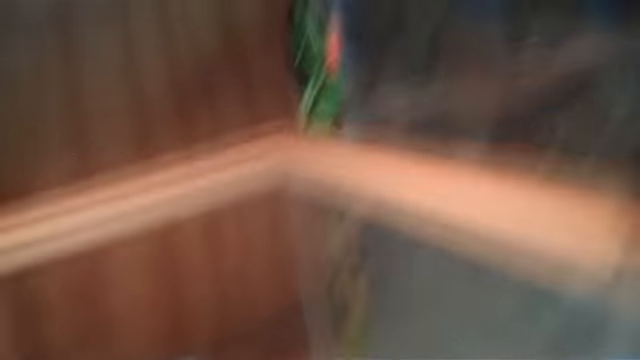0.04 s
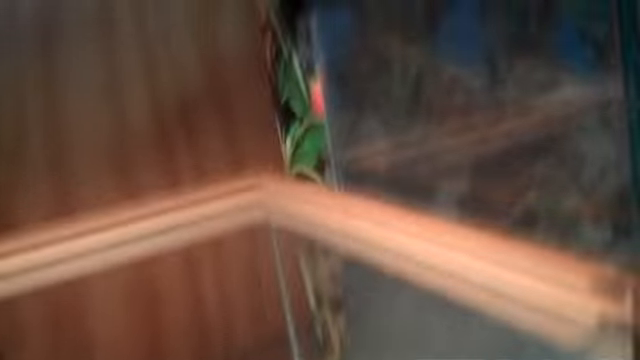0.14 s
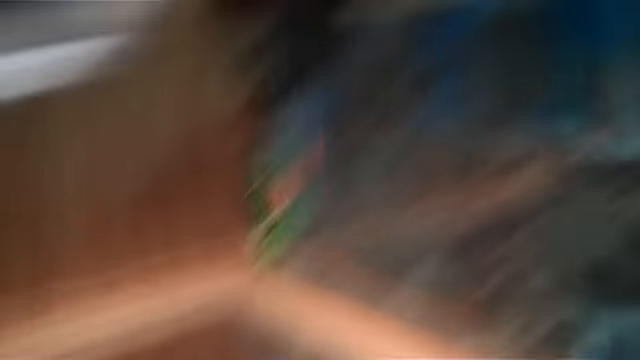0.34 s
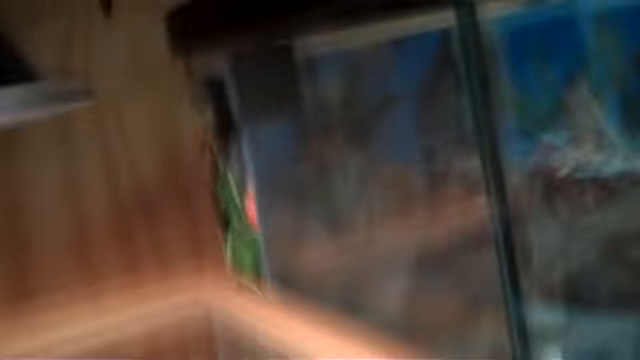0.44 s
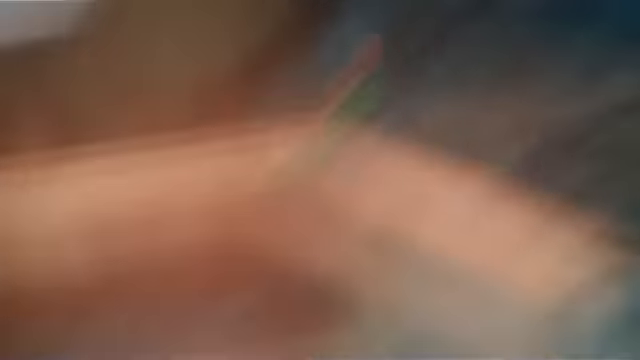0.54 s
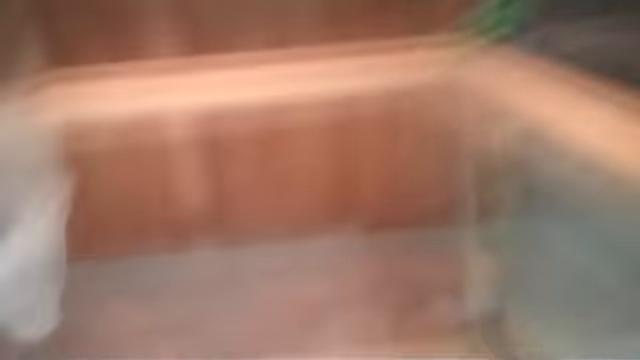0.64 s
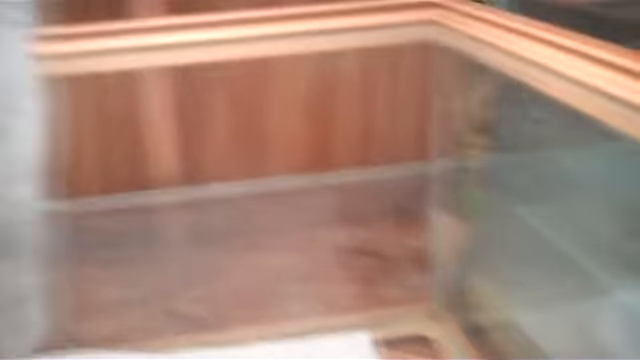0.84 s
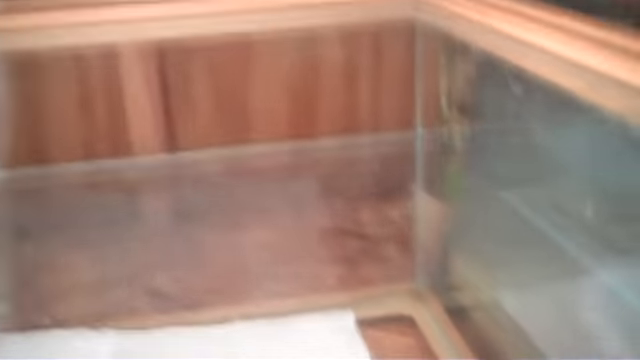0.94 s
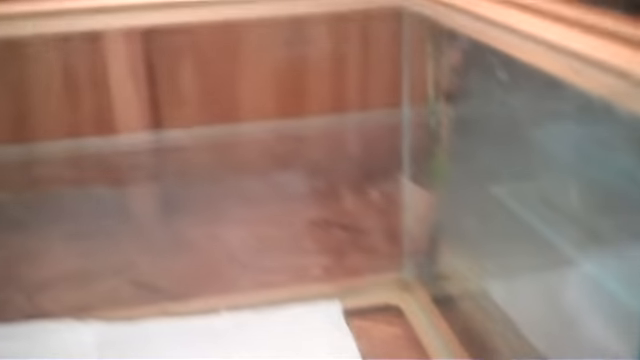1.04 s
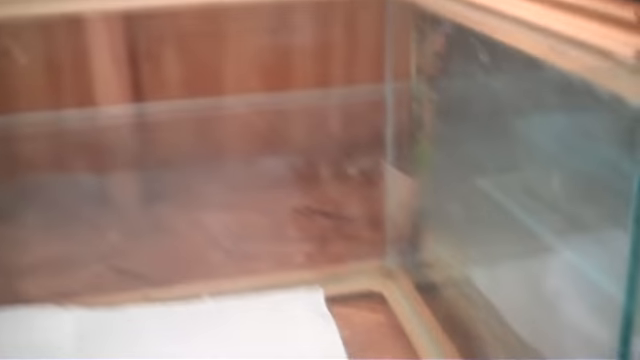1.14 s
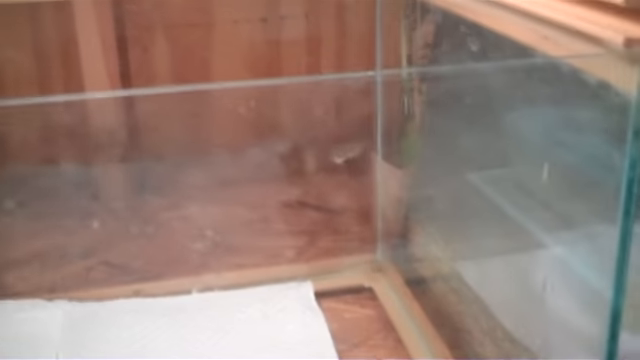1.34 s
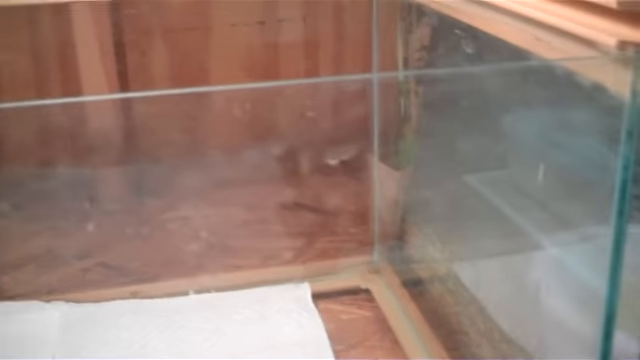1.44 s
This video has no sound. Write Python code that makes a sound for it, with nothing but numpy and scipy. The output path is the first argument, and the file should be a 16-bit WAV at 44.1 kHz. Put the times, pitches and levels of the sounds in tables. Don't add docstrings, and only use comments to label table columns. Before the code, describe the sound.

A thin plastic tub crackles under a gripping hand, very close: small knocks and skin scrapes from 0 s, the loudest sharp snaps around 0.17-0.21 s, another bright cluster at 0.31 s. It falls quiet by 0.4 s. A single snap comes at 0.64 s, then dry bedding trickles faintly onto paper, with isolated ticks near 0.71, 0.99, 1.11, 1.17 and 1.29 s over soft room hush.

```python
import sys
import numpy as np
from scipy import signal
from scipy.fft import rfft, irfft, next_fast_len
from scipy.io import wavfile
from scipy.ndimage import uniform_filter1d

SR = 44100
rng = np.random.default_rng(int(sys.argv[2]) if len(sys.argv) > 2 else 0)


def to_linear_factor(level_db):
    exponent = np.asarray(level_db, float) / 20
    return 10 ** exponent


def to_wav(sig):
    pcm = np.clip(np.atleast_2d(sig), -1, 1) * 32767
    pcm = np.round(pcm).astype(np.int16)
    wavfile.write(sys.argv[1], SR, pcm.T)


N = 63945

# f/Hz, density/dB
ROOM_SPECTRUM = [(20, -12), (70, 4.5), (180, 4.5), (330, -0.5), (600, 2), (1700, -19.5), (6000, -15),
                 (11000, -23.5), (14000, -38)]
# t/s, level/dB
BEDDING_FLOW = [(0, -80), (.3, -45), (.45, -50.5), (.52, -55.5), (.6, -50.5), (.66, -44.5), (.7, -48.5),
                (.78, -44.5), (.86, -50.5), (.92, -46), (.97, -42.5), (1.04, -41), (1.1, -44), (1.155, -48),
                (1.19, -44), (1.25, -49), (1.3, -43.5), (1.45, -47.5)]
# f/Hz, density/dB
RUSTLE_SPECTRUM = [(200, -8), (400, -6), (1300, -5), (4000, -2), (7000, -6), (9000, -7.5), (11500, -8),
                   (14000, -2.5)]
# t/s, level/dB
HAND_EFFORT = [
    (0, -54),
    (.05, -50),
    (.058, -51),
    (.08, -40.5),
    (.11, -39),
    (.145, -35),
    (.163, -47),
    (.19, -31.5),
    (.24, -39.5),
               (.255, -36),
    (0.279, -38.5),
    (.3, -41.5),
    (.31, -40),
    (.325, -39),
    (.335, -48),
    (0.358, -54.5),
    (0.392, -48),
    (0.429, -54.5),
]
# f/Hz, density/dB
SCRAPE_SPECTRUM = [(200, 0), (400, 2.5), (1200, 0.5), (3000, -7.5), (6000, -9), (9000, -17.5), (11000, -38),
                   (14000, -48)]
# f/Hz, density/dB
THUD_SPECTRUM = [(20, -48), (60, -11.5), (120, -16.5), (280, -5.5), (600, -20.5), (1200, -31)]
GRAIN_BANDS_HZ = [0, 1200, 3000, 5500, 22050]
# t/s, level/dB, f/Hz
PANEL_RINGS = [(.054, -35, 2020), (.084, -26, 670), (.1707, -32, 876), (.1828, -28, 793), (.2145, -38, 910),
               (.3127, -37, 820), (.5365, -41, 653), (.5365, -52.5, 1056), (.7127, -39, 1070),
               (.7127, -51, 1550), (.7127, -41, 2350), (.9393, -38.5, 700), (.9868, -37.5, 1070),
               (.9868, -41, 2020), (.9868, -40, 2480), (1.0825, -43, 965), (1.1748, -36.5, 646),
               (1.1748, -45, 1600), (1.1748, -39.5, 2680), (1.2935, -40.5, 1200)]
# peak t/s, level/dB, ring f/Hz, length/cycles, crackle re
# peak level/dB
KNOCKS_AND_THUMPS = [(0.0273, -18.5, 1570, 2, -23), (0.0553, -25, 2280, 4.5, -9.5), (0.0845, -23, 708, 3.54, -15),
                     (0.1403, -27, 1560, 1.2, -13.5), (0.1683, -21, 1290, 0.65, -8),
                     (0.1707, -15.5, 1470, 1.3, -18.5), (0.1777, -26.5, 3260, 3.3, -5),
                     (0.1826, -20.5, 960, 1.02, -11), (.1826, -14.5, 2955, 1.5, -19.5),
                     (.1853, -30, 900, 2.3, -6), (0.1917, -30, 1150, 2.9, -14.5), (0.2143, -21, 2120, 1.4, -24),
                     (0.2143, -24.5, 4000, 3, -18), (.2162, -22.5, 790, 1.95, -16.5), (.202, -32, 690, 2.8, -11),
                     (.2385, -30, 696, 1.7, -33), (0.2483, -25.5, 890, 0.86, -37), (.2482, -31, 3400, 1.5, -6),
                     (0.2595, -37, 1440, 1.6, -18), (.2605, -33.5, 2570, 3.9, -20), (0.3125, -17, 3670, 2.9, -26),
                     (.3128, -26, 1510, 0.7, -14), (0.5372, -40.5, 740, 2.7, -16),
                     (0.6408, -40.5, 2540, 0.39, -18), (0.7128, -27, 2080, 1.2, -18.5),
                     (0.813, -39.5, 860, 1.4, -16), (0.879, -37.5, 2300, 0.84, -31),
                     (0.9129, -39.5, 1250, 0.52, -13), (0.9396, -33.5, 1210, 0.8, -18),
                     (0.987, -25.5, 1500, 0.78, -39), (1.0828, -32, 2040, 0.78, -41),
                     (1.1102, -27.5, 3520, 4.5, -20), (1.1749, -28, 2300, 2.55, -17.5),
                     (.0285, -29.5, 473, 4.4, -10), (.063, -27, 1730, 2.54, -10), (0.117, -42, 275, 0.92, -7),
               (0.185, -32, 78.6, 1.34, -26), (0.2627, -34, 252, 4.2, -10), (.258, -28, 320, 1.6, -4),
               (0.248, -42.5, 290, 0.93, -10), (0.312, -31, 147, 0.59, -2), (0.41, -43.5, 146, 2.2, -9),
               (.7128, -36.5, 4140, 4.3, -11), (0.9876, -31, 3660, 3.7, -20), (1.045, -42, 2420, 7.2, -9),
               (1.175, -25.5, 4600, 4.8, -11), (1.258, -57, 3000, 1.4, -9), (1.293, -34, 4770, 6, -13),
               (1.297, -37, 2200, 2.6, -8)]
# peak t/s, level/dB, ring f/Hz, crackle re peak level/dB
WALL_SNAPS = [(0.0535, -39, 5340, -26), (0.083, -40.5, 5400, -9), (0.105, -35, 5940, -6),
              (0.1777, -30, 5600, -18), (0.2516, -29, 5880, -21), (0.2609, -35.5, 5230, -8.5),
              (0.2875, -36, 7040, -9), (0.2987, -29, 5780, -13), (0.3077, -24, 6640, -25),
              (0.3183, -26.5, 5900, -12), (0.3255, -48, 5960, 1), (0.3772, -36, 6900, -14),
              (0.6432, -26.5, 6400, -12.5), (1.1777, -31.5, 6110, -10), (1.2934, -38, 4950, -18),
              (.1682, -34, 6000, -10), (.1722, -27, 5200, -16), (.1845, -24, 5800, -16),
               (.2152, -23, 5600, -16), (.22, -33, 6000, -12), (.3065, -27, 6800, -16),
               (.3103, -20, 6800, -22), (.3116, -23, 6500, -22), (.3139, -21, 6800, -22),
               (.3178, -27, 7200, -12), (.3208, -26, 5800, -12), (.3244, -28, 5800, -11),
               (.3265, -29, 4600, -20), (.6428, -33, 5800, -16), (.647, -35, 7000, -14),
               (.6487, -38, 7300, -14), (.6583, -39, 7200, -14)]
# peak t/s, level/dB, ring f/Hz, length/cycles, second channel/first (-1..1)
LOUD_FOLDS = [
    (.1703, -12.5, 6400, 8, 0.02),
    (.183, -17, 6050, 8, -.3),
    (.2143, -18, 6800, 4, 0.05),
    (.3122, -19, 6500, 7, .1),
    (.3129, -15, 7000, 7, .2),
    (.6408, -22, 7200, 5, .3),
    (1.1102, -30, 7300, 4, .1),
    (1.1746, -24, 7400, 5, .2),
]
# t/s, level/dB
FOLD_CRACKS = [
    (.1682, -38),
    (.1702, -27),
    (.1827, -17),
    (.2142, -30),
    (.6407, -28),
    (1.1746, -37),
]
# f/Hz, correlation/1
PORT_LIKENESS = [(60, 0.68), (300, 0.82), (1400, 0.79), (3100, 0.64), (6800, 0.05), (15000, 0.22)]
# cavity f/Hz, width/Hz, lift/dB, level/dB, shade f/Hz, bass/dB
PORTS_NEAR = [(7290, 1240, 13, 0, 23000, -2.5), (6260, 1350, 15, 2.5, 7500, -11.5)]
# cavity f/Hz, width/Hz, lift/dB, level/dB, shade f/Hz, bass/dB
PORTS_AWAY = [(7440, 780, 14.4, 0.39, 23400, -0.27), (6140, 2700, 13.9, -1.1, 5400, 0.24)]


def evened(x):
    return x / np.sqrt(np.mean(x ** 2) + 1e-20)


def read(points, hz):
    f, value = np.transpose(points)
    return np.interp(np.log(hz + 1), np.log(f + 1), value)


def over_time(points):
    return np.interp(np.arange(N) / SR, *np.transpose(points))


def add(mix, s, sound):
    part = mix[:, round(s * SR):][:, :sound.shape[1]]
    part += sound[:, :part.shape[1]]


def filtered(x, gain):
    size = next_fast_len(N + 4096)
    return irfft(rfft(x, size) * gain(np.fft.rfftfreq(size, 1 / SR)), size)[..., :N]


def low_passed(x, top_hz, order):
    return filtered(x, lambda hz: 1 / (1 + (hz / top_hz) ** order))


def coloured(x, spectrum):
    return evened(filtered(x, lambda hz: to_linear_factor(read(spectrum, hz))))


def grains(per_s, spread_db, length_s, smooth, shared):
    shape = (len(GRAIN_BANDS_HZ), N)
    size = to_linear_factor(spread_db * np.minimum(rng.exponential(1, shape), 3))
    size = size * (rng.random(shape) < per_s / SR)
    decay = np.exp(-1 / (length_s * SR))
    flicker = evened(signal.lfilter([1], [1, -decay], size))
    noise = rng.standard_normal((2, N))
    out = np.zeros((2, N))
    for lo, hi, own in zip(GRAIN_BANDS_HZ, GRAIN_BANDS_HZ[1:], flicker):
        level = smooth + shared * flicker[-1] + own
        out += filtered(level * noise, lambda hz: (hz >= lo) & (hz < hi))
    return out


def room():
    hum_hz, hum_width_hz, hum_db, hush_db = 334, 9.7, -68.5, -63.5
    noise = rng.standard_normal((2, N))
    hum = evened(filtered(noise, lambda hz: 1 / (1 + ((hz - hum_hz) / hum_width_hz) ** 2)))
    hush = coloured(rng.standard_normal((2, N)), ROOM_SPECTRUM)
    return to_linear_factor(hush_db) * hush + to_linear_factor(hum_db) * hum


def bedding():
    flakes = grains(per_s=360, spread_db=9.0, length_s=0.0021, smooth=1.9, shared=0.2)
    return to_linear_factor(over_time(BEDDING_FLOW) - 3.5) * coloured(flakes, RUSTLE_SPECTRUM)


def hand():
    thud_db, thud_follow, thud_until_s = -51.5, 0.97, 0.42
    effort_db = over_time(HAND_EFFORT + [(0.66, -77)])
    slips = grains(per_s=860, spread_db=12.0, length_s=0.0016, smooth=0.56, shared=0.71)
    scrape = to_linear_factor(effort_db - 7.0) * coloured(slips, SCRAPE_SPECTRUM)
    presses = grains(per_s=39, spread_db=3.5, length_s=0.016, smooth=0.27, shared=0.053)
    loosen_db = -90 * np.maximum(np.arange(N) / SR - thud_until_s, 0)
    level_db = thud_db + thud_follow * (effort_db + 43.5) + loosen_db
    return scrape + to_linear_factor(level_db) * coloured(presses, THUD_SPECTRUM)


def panels():
    t60_s = .024
    out, t = np.zeros((2, N)), np.arange(4000) / SR
    phase_rad, share = np.array([[0], [1.5]]), np.array([[1], [.35]])
    for s, db, hz in PANEL_RINGS:
        tone = np.sin(2 * np.pi * hz * t + phase_rad)
        add(out, s, to_linear_factor(db - 60 * t / t60_s) * tone * share)
    return out


def hits(rows, edge_db):
    edge_s, tail_top_db = .00005, -10
    out, t = np.zeros((2, N)), np.arange(2600) / SR
    chance = rng.standard_normal((len(rows), 3, len(t)))
    for (s, db, hz, cycles, tail_db, tail_s, *lean), (a, b, c) in zip(rows, chance):
        rise_s = max(cycles, .5) / hz / 4
        u = t / rise_s
        phase_rad = 2 * np.pi * np.array([[0], [0 if lean else c[0]]])
        ring = (u * np.exp(1 - u)) ** 2 * np.cos(2 * np.pi * hz * (t - rise_s) + phase_rad)
        ring = ring * np.array([[1], lean or [.3]])
        edge = to_linear_factor(edge_db) * np.exp(-abs(t - rise_s) / edge_s) * np.sign([a, b])
        band_hz = np.clip([0.48 * hz, 1.49 * hz], 30, 18000)
        crackle = evened(signal.lfilter(*signal.butter(2, band_hz, "band", fs=SR), [a, b]))
        lumps = np.exp(.5 * evened(uniform_filter1d(c, size=30)))
        fade = np.exp(-t / tail_s) * np.minimum(u / 3, 1) ** 2
        tail = to_linear_factor(min(tail_db, tail_top_db)) * crackle * lumps * fade
        add(out, s - rise_s, to_linear_factor(db) * (-ring + edge + tail))
    return out


def knocks():
    tail_s = 0.0061
    rows = [(*row, tail_s) for row in KNOCKS_AND_THUMPS]
    return low_passed(hits(rows, edge_db=-12), 6500, 4)


def snaps():
    level_db, cycles, tail_s = -1.5, 5, 0.0046
    rows = [(s, db + level_db, hz, cycles, tail_db, tail_s)
            for s, db, hz, tail_db in WALL_SNAPS]
    fold_tail_db, fold_tail_s = -24, .003
    folds = [(*row, fold_tail_db, fold_tail_s, lean) for *row, lean in LOUD_FOLDS]
    sound = hits(rows, edge_db=-30) + hits(folds, edge_db=-30)
    return low_passed(sound, 13600, 20)


def cracks():
    out = np.zeros((2, N))
    for s, db in FOLD_CRACKS:
        add(out, s, to_linear_factor(db) * np.array([[0.57, -3], [1.0, -1]]))
    return out


def ports(pair, cavities):
    left_early_s = .00001

    def port(side, cavity_hz, width_hz, lift_db, level_db, shade_hz, bass_db):
        def gain(hz):
            turn = np.arccos(np.clip(read(PORT_LIKENESS, hz), -1, 1)) / 2
            damping = 1j * hz * width_hz
            cavity = 1 + to_linear_factor(lift_db) * damping / (cavity_hz ** 2 - hz ** 2 + damping)
            shade = np.exp(1j * np.pi * hz * side * left_early_s) / (1 + 1j * hz / shade_hz) ** 2
            level = to_linear_factor(level_db + bass_db / (1 + (hz / 900) ** 2))
            return level * cavity * shade * np.array([np.cos(turn), side * np.sin(turn)])
        return filtered(pair, gain).sum(0)

    return np.array([port(side, *cavity) for side, cavity in zip((1, -1), cavities)])


def scene():
    swing_s, swing_length_s = 0.535, 0.21
    soft = low_passed(room() + bedding() + hand(), 12200, 20)
    sound = soft + panels() + knocks() + snaps() + cracks()
    progress = np.clip((np.arange(N) / SR - swing_s) / swing_length_s + .5, 0, 1)
    swing_rad = np.pi / 2 * progress
    return ports(sound * np.cos(swing_rad), PORTS_NEAR) + ports(sound * np.sin(swing_rad), PORTS_AWAY)


def top_cut(x):
    return signal.sosfilt(signal.butter(12, 16650, fs=SR, output="sos"), x)


def record(dry):
    mix = low_passed(dry, 16500, 60)
    return top_cut(mix)


dry = scene()
out = record(dry)
to_wav(out)
```